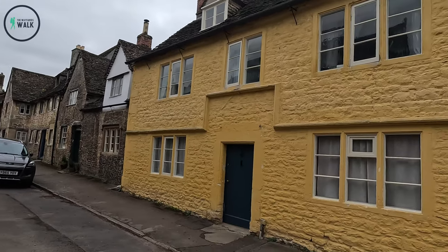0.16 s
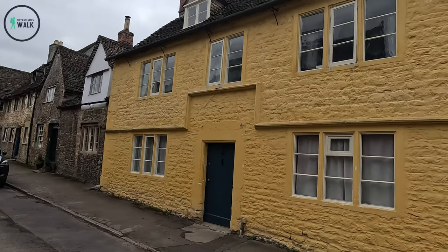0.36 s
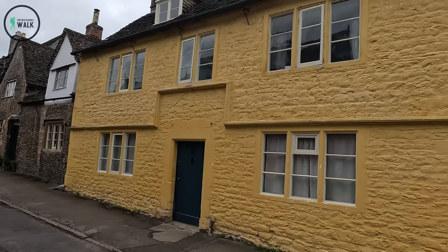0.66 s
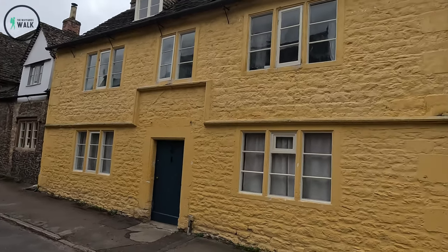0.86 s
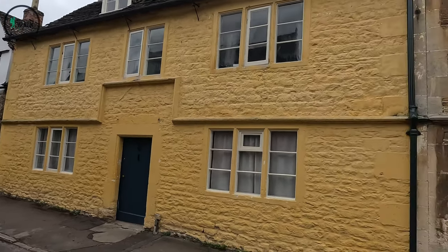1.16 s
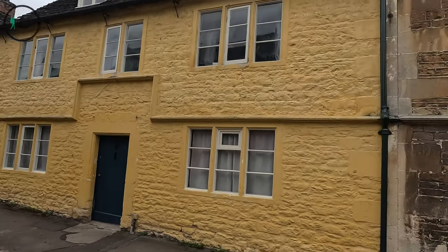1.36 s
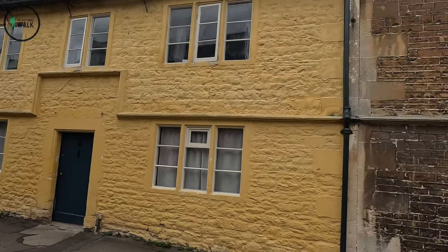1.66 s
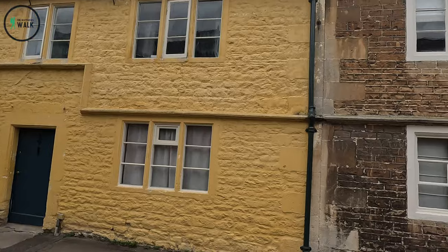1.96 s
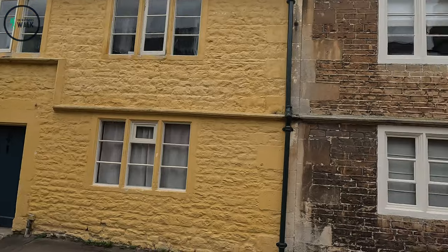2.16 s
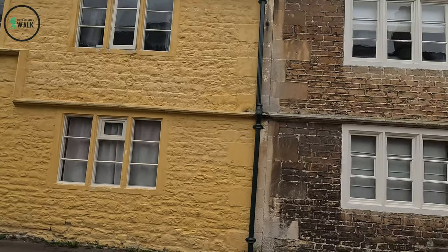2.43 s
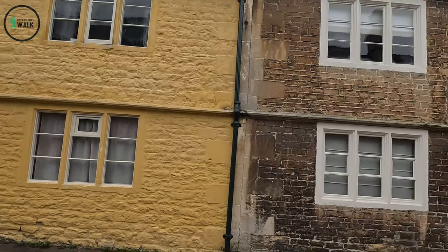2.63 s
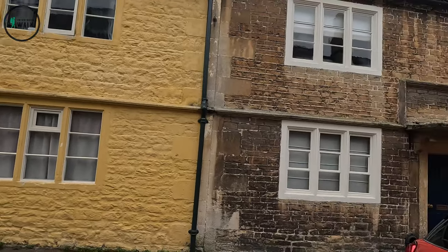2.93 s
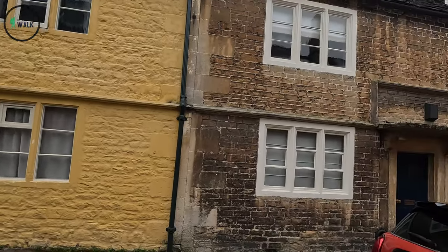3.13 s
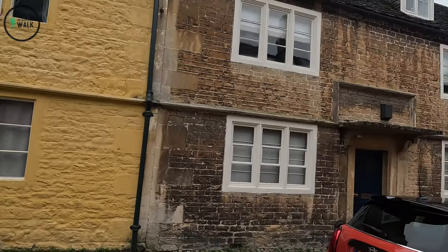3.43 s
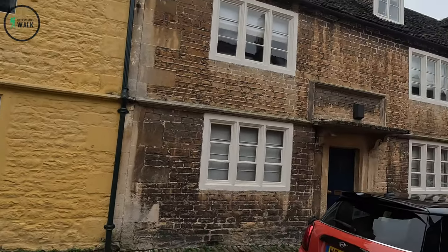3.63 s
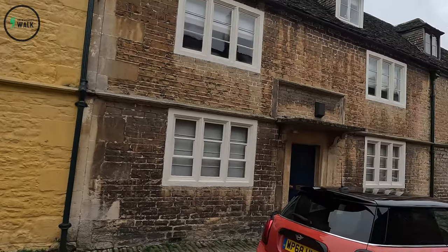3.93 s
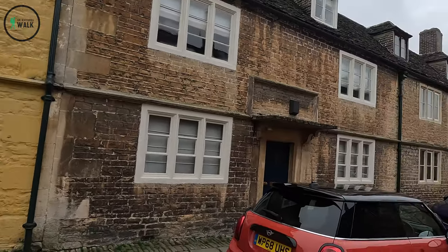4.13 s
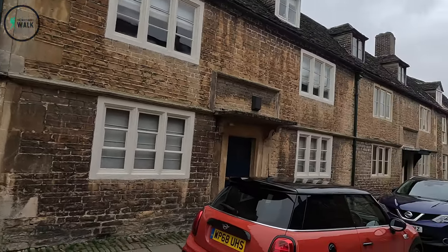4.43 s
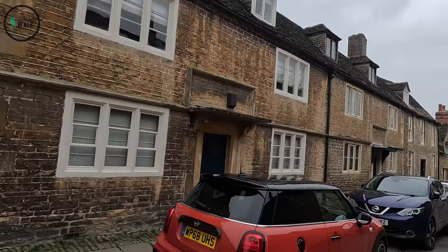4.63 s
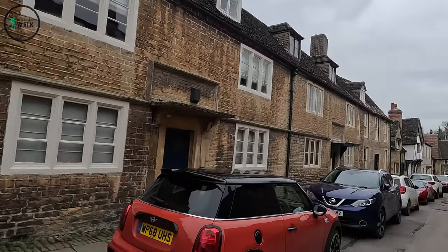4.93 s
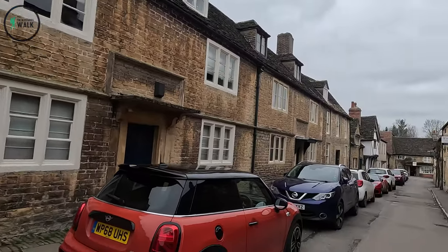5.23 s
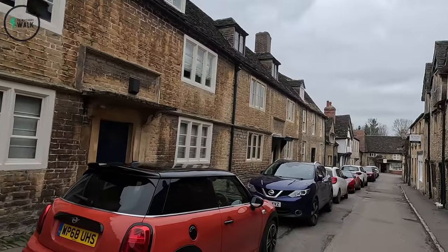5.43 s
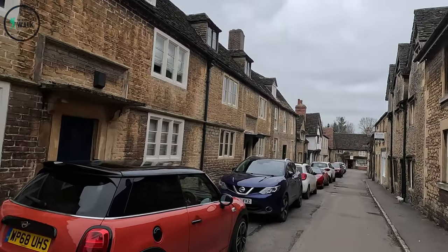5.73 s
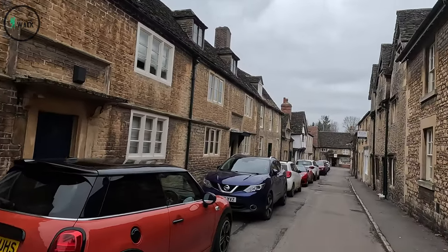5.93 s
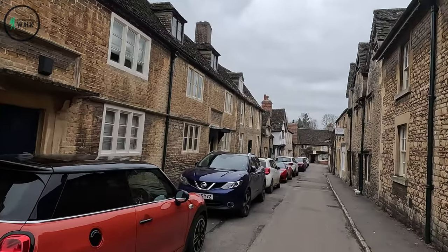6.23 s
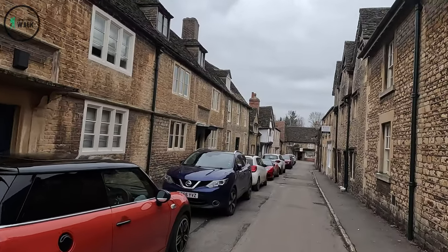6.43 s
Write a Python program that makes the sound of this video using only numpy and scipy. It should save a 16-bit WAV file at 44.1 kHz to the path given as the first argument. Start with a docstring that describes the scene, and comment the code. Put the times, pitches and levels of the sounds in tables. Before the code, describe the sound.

A quiet narrow street between stone houses. Distant rooks caw hoarsely again and again, softened by echo, while sharp short jackdaw yelps come near one second, just after four, and near six. Close to the microphone, shoes scuff grit, a loose stone clatters around 2.6 seconds, and dull bumps thud. Low wind rumbles on the microphone throughout.

```python
"""Rooks caw hoarsely from far trees beyond a narrow street of stone houses, and nearer jackdaws give short,
mostly falling yelps that slap between the fronts. Close by, shoes crunch on grit, a loose stone clatters and
soft bumps thud; wind rumbles on the microphone, thin far tones whistle and a far village washes behind.
Caws and yelps are summed harmonics with breath noise, the whistling tones are gliding sines, solid knocks are
short rings, and grit, wind and background are filtered noise; the fronts add echoes and a diffuse tail."""
import sys
import numpy as np
from scipy import signal
from scipy.fft import rfft, irfft, next_fast_len
from scipy.io import wavfile
from scipy.ndimage import uniform_filter1d, map_coordinates

SR = 44100
rng = np.random.default_rng(int(sys.argv[2]) if len(sys.argv) > 2 else 0)


def wav_record(signal):
    """Record a signal, one row per channel, as 16-bit PCM in the file named by sys.argv[1]."""
    frames = np.transpose(np.atleast_2d(signal))
    bounded = np.clip(frames, -1, 1)
    # unit amplitude maps onto the largest positive 16-bit level
    quanta = np.round(bounded * 32767).astype(np.int16)
    wavfile.write(sys.argv[1], SR, quanta)


N = 290072  # samples

# Rook caws, before the direct and echo gains: (time [s], length [s], onset to crest [s], downward slide [s],
# start pitch [Hz], top pitch [Hz], end pitch [Hz], start level [dB], crest level [dB], end level [dB],
# mouth opening [factor on throat frequencies], harshness [dB/octave], overtones [dB], far echo [dB])
ROOK_CAWS = [(-.05, 0.24, 0.08, 0.14, 194, 197, 186, -75, -75.5, -63, 0.89, -13, -4, -13),
             (0.596, .33, 0.063, 0.087, 158.2, 178.5, 164.8, -58, -57.5, -57, .965, -5, -4, -4.5),
             (.978, .37, 0.19, .13, 193.8, 194.9, 187.6, -71, -68.5, -70, 1.048, -3, 4, -9),
             (1.471, 0.56, 0.29, 0.15, 170.2, 177.2, 167, -78, -66, -62, 1.003, 0, 1, -11),
             (2.236, 0.41, .12, 0.15, 203, 207.7, 196.4, -66, -63.5, -62, 1.003, -7, -10, -8),
             (2.761, 0.17, .08, 0.18, 198, 201.2, 198, -69, -69.5, -74, 1.05, 22, -12, -1),
             (2.949, 0.39, .14, 0.12, 197.4, 199.5, 187.6, -73, -61, -63, 0.98, 5.5, -2.5, -16),
             (3.725, 0.4, 0.16, 0.14, 195.5, 201.6, 186.4, -57, -56.5, -58.5, 1.026, -6, 4, -12),
             (4.565, .46, .2, 0.12, 186.3, 192.5, 174.2, -56, -58.5, -61.5, 1.022, -4.5, -3, -5.5),
             (4.983, 0.28, 0.15, .13, 172, 173.6, 165, -69, -69.5, -65, .95, 3, 9, -14),
             (5.372, 0.33, 0.13, .13, 188.7, 192.3, 177.6, -63.5, -60, -65, 1.034, -1, 7, -10.5),
             (6.053, 0.6, 0.25, 0.13, 170.1, 175, 166, -77, -65, -86, 0.8, 8, 9, -3)]
# Resonances of a rook's throat: (frequency [Hz], gain [dB])
ROOK_THROAT = [(200, -67), (500, -36.5), (870, -25), (1010, -10.5), (1190, -9.5), (1320, -3), (1440, 3.5),
               (1600, 0), (1780, -3), (1960, 1.5), (2120, -10), (2600, -24), (3300, -20), (3900, -29.5),
               (8000, -93)]
# Band that a strained caw adds: (frequency [Hz], share of the overtones column [0-1])
STRAINED_BAND = [(2400, 0), (3000, 1), (3700, 1), (4600, 0)]
# High overtones dissolve into breath: (frequency [Hz], level left in the harmonics [dB])
HARMONICS_LEFT = [(2200, 0), (3000, -1), (3700, -4), (6000, -12)]
# Jackdaw yelps: (time [s], length [s], rise [s], level after the rise [dB], level change by the end [dB],
# start pitch [Hz], dive [octaves/s], voice break after onset [s], pitch at the break [Hz], sag [octaves/s],
# roughness before the base amount [0-1], beak resonance at start [Hz], at end [Hz], its strength [dB],
# delay of this yelp's own wall echo [s], echo level [dB], shrillness of the top overtones [dB])
JACKDAW_YELPS = [(0.672, 0.052, 0.013, -70, 4, 1380, 9, 0.014, 680, 5.3, 0.6, 2630, 2480, 16, 0.057, -6, -2),
                 (0.699, 0.069, 0.022, -57.5, -5.5, 1350, 8, 0.037, 650, 4, 0.6, 2450, 2460, 8, 0.044, -5.5, -6),
                 (0.967, 0.052, 0.02, -42.5, -11.5, 1313, 15, .025, 790, 13, 0.26, 1920, 2660, 7, 0.033, -12, 0),
                 (1.014, 0.032, 0.018, -53, -2, 1440, 9, 0.00484, 753, 10, 0.2, 2630, 2260, 6, 0.019, -10, -5),
                 (4.154, 0.049, 0.0048, -50, -8, 1492, 13.5, 0.028, 750, 9.6, 0.24, 1120, 2360, 14, 0.074, -9.5, -21),
                 (4.195, 0.027, 0.0073, -51.5, -2, 1679, 5, 0.072, 600, 6, 0.2, 1650, 1200, 2, 0.036, -9, -11),
                 (4.211, 0.052, 0.016, -55.5, 2, 1220, 5, 0.0041, 605, 5.4, 0.02, 2190, 1390, 18, 0.033, -22, -2),
                 (5.892, 0.06, 0.01, -49.5, -4.5, 1324, -7, 0.013, 628, 5.1, 0.21, 1440, 2300, 6, 0.03, -6.5, 0.5)]
# Resonances of a jackdaw's throat: (frequency [Hz], gain [dB])
JACKDAW_THROAT = [(500, -47), (950, -41), (1150, -7), (1350, 3.5), (1700, -4.5), (2150, 1), (2750, -1),
                  (3150, -18.5), (3600, -9.5), (4300, -17.5), (5200, -17), (7500, -29), (16000, -77)]
# Echoes off the house fronts, shared by all yelps: (delay [s], level [dB])
HOUSE_FRONTS = [(.022, -26), (.031, -12.5), (0.055, -13.5), (.074, -19.5), (.086, -21), (.105, -25)]
# Dying away of sound between the houses: (frequency [Hz], time to fall 60 dB [s])
STREET_T60 = [(150, 0.089), (1500, 0.58), (4000, 0.61), (12000, 0.2)]
# Far thin whistling tones, some of them high overtones of the caws, before the direct and tail gains:
# (time [s], length [s], start pitch [Hz], end pitch [Hz], level [dB], blur [share of the pitch])
WHISTLING_TONES = [(.13, 0.42, 828, 818, -78.5, 0.075), (1.147, 0.34, 5060, 4820, -90.5, 0.095),
                   (1.552, 0.19, 4500, 3960, -87.5, 0.088), (1.76, 0.14, 7600, 7100, -90, 0.021),
                   (2.038, 0.19, 7060, 6470, -89.5, 0.022), (3.578, 0.21, 4880, 4400, -84.5, 0.086),
                   (4.419, 0.27, 8260, 8600, -97, 0.023), (4.612, 0.13, 4560, 3790, -82.5, 0.062),
                   (4.752, 0.34, 3430, 3340, -81.5, 0.031), (5.017, .3, 3360, 3120, -85.5, .035),
                   (5.425, 0.33, 3024, 3050, -81.5, 0.019), (5.5, 0.29, 3290, 3440, -85, 0.025)]
# Soles rubbing on grit: (time of full pressure [s], rise [s], decay per 60 dB [s], grit level [dB],
# treble lift [dB/octave], hollow heel level [dB])
SCUFFS = [(0.151, 0.033, 0.5, -78, -4, -63.5), (1.886, .022, 0.5, -73.5, 9, -89),
          (2.01, 0.031, 0.16, -52, 0.5, -66), (2.463, 0.0048, 0.54, -74, 10, -66),
          (2.612, 0.0053, 0.84, -67, 4, -90), (3.267, 0.002, 0.39, -67.5, 8.5, -52),
          (3.299, 0.0083, 0.37, -68, 12, -57.5), (3.336, 0.0097, 0.3, -71, 14, -55.5),
          (3.358, 0.0059, 0.1, -58.5, 18, -45.5), (3.368, 0.0021, 0.1151, -58.5, 17, -50.5),
          (3.389, 0.0088, 0.63, -68.5, 14, -78), (4.11, 0.018, 2.5, -78, 13, -70.5),
          (4.965, .006, 0.18, -60.5, 1, -71), (5.008, 0.018, 0.5, -70, 15, -75),
          (5.697, 0.0024, 0.16, -55.5, -14, -70), (5.705, 0.0043, 0.2, -75, 20, -71),
          (6.374, 0.093, 0.5, -67.5, 7.5, -73), (6.525, 0.0021, 0.7, -64.5, -11, -69.5)]
# Colour of crushed grit: (frequency [Hz], gain [dB])
GRIT = [(300, -12), (800, -9), (1300, 7.5), (2200, 6), (3200, 6), (4800, -7), (7500, -15.5), (10500, -35),
        (13000, -31.5), (15500, -47)]
# Hollow resonances of the heel: (frequency [Hz], width of one filter pass [Hz], gain [dB])
HEEL = [(198, 127, -3), (327, 230, -9), (521, 150, -2.5), (614, 170, -12), (790, 67, -1.5),
        (1226, 900, -13)]
# Single stones cracking under a shoe: (time [s], peak level [dB], treble lift [dB/octave])
CRACKS = [(1.882, -51, -6), (2.463, -42, -22), (3.2987, -54, 0), (3.354, -43, 18), (3.363, -42, 17),
          (4.96, -40.5, -3), (5.026, -46, 12), (5.696, -43, -18), (6.524, -43, -22)]
# Knocks of a loose stone: (time [s], peak level of the ring [dB], treble lift [dB/octave])
STONE_KNOCKS = [(2.6092, -44, -3), (2.613, -45, -7), (2.6171, -49, -6), (2.627, -48, 0), (2.6604, -47, -1)]
# Ringing of the stone: (frequency [Hz], level [dB], time to fall 60 dB [s])
STONE_MODES = [(1260, -1.5, 0.03), (2050, -3, 0.025), (3110, 0, .025), (3500, 5, 0.013), (4400, -10, .008)]
# Soft bumps of footfalls and of the handling: (time [s], level [dB], ring [Hz], time to fall 60 dB [s])
SOFT_BUMPS = [(0.519, -58, 165, 0.27), (2.161, -55, 105.3, 0.81), (2.681, -52.5, 124.8, 0.48),
              (3.1, -53.5, 148.9, 0.76), (3.335, -51, 263, 0.077), (3.666, -51, 119, 0.098),
              (3.669, -48.5, 304, 0.034), (3.799, -53.5, 107.8, 0.57), (4.198, -53.5, 161.6, 0.73),
              (4.339, -50, 158, 0.079), (4.832, -51, 175, 0.1), (4.947, -50, 71.3, 0.47),
              (5.067, -46.5, 133, 0.041), (5.533, -46, 219, 0.034), (5.779, -50.5, 205, 0.06),
              (6.158, -43, 170, 0.2), (6.224, -52.5, 160.4, 0.23)]
# Wind rumble at the microphone, before gain and buffets: (time [s], level [dB])
RUMBLE_LEVEL = [(0.0, -39.5), (0.49, -59), (0.52, -47.5), (2.61, -50.5), (2.68, -39.5), (2.71, -48.5),
                (3.42, -51.5), (3.53, -39.5), (3.64, -48.5), (5.19, -48), (5.27, -45), (6.04, -48.5),
                (6.06, -54.5), (6.5, -45.5)]
# Wind flutter at the microphone, before gain and buffets: (time [s], level [dB])
FLUTTER_LEVEL = [(0, -66.5), (.6, -64.5), (1.5, -65.5), (2.15, -62.5), (2.45, -69.5), (2.7, -66),
                 (3.35, -63.5), (3.55, -66), (4.2, -61), (4.7, -65), (5, -65.5), (5.95, -63.5),
                 (6.5, -55.5)]
# Spectra of the two kinds of wind noise: (frequency [Hz], relative density [dB per Hz])
RUMBLE = [(8, -1.5), (18, 2.5), (33, -4), (52, -7), (70, -18.5), (100, -25), (200, -46.5), (2000, -120)]
FLUTTER = [(20, -23), (60, -5.5), (105, 1.5), (160, -2.5), (230, -6), (320, -17.5), (600, -30.5),
           (4000, -110)]
# Wash of the far village: (frequency [Hz], relative density [dB per Hz])
VILLAGE = [(30, -31), (150, -8.5), (280, -3), (400, -3), (600, -4.5), (800, -5.5), (1100, -2.5),
           (1600, -7.5), (2200, -11.5), (3000, -25), (4500, -29.5), (8000, -30), (12000, -43), (16000, -47)]
# Strength of that wash, before its sway: (time [s], level [dB])
VILLAGE_LEVEL = [(0, -72), (.5, -72.5), (1.3, -71), (2.8, -71), (3.5, -71.5), (4.4, -71.5), (5.3, -71),
                 (6.58, -70.5)]
# Clothes rustling close by: (frequency [Hz], relative density [dB per Hz])
RUSTLE = [(1500, -11), (3500, 3), (7000, -10), (10500, -14.5), (12800, -21), (14000, -20), (15000, -30)]
# Strength of the rustle, before its sway: (time [s], level [dB])
RUSTLE_LEVEL = [(0, -91.5), (1.1, -85), (1.3, -83.5), (2.9, -88), (3.5, -80), (3.9, -83), (4.3, -84),
                (5.3, -86), (5.8, -79), (6.1, -85.5), (6.58, -77)]
# Many farther rooks blurred together, before their sway: (time [s], level [dB])
ROOKERY_LEVEL = [(0, -82), (.5, -90), (1.15, -69), (1.45, -75.5), (2.1, -70.5), (2.8, -75.5), (3.6, -77),
                 (4.4, -74.5), (5.3, -71.5), (6.2, -68), (6.58, -74)]

# Caws: share of breath power, unevenness of the pulses and slow waver (shares of the pitch)
CAW_ROUGH, CAW_JITTER, CAW_WANDER = .1, .011, .0035
CAW_SMEAR_TURNS = .15  # random lag of each harmonic, which softens the pulses
CAW_HALF_LINES_DB = -12.5  # strong and weak pulses alternate: hoarse lines between the harmonics
CAW_SCATTER_DB = -9.5  # smeared paths against the direct one
NEAR_ECHO_S, NEAR_ECHO_DB = .06, -11.5  # a caw glances off the roofs
FAR_ECHO_S = .15  # a caw comes back from the end of the street
# Each harmonic swells and fades on its own: depth, and how often
FADING_DB, CAW_FADING_HZ, YELP_FADING_HZ = 2, 14, 130
YELP_JITTER, YELP_BASE_ROUGH = .08, .08  # pitch unevenness per unit roughness; roughness of every yelp
CLEAR_ROUGH_SHARE = 0.062  # before the break the voice is much smoother
BREAK_S, BREAK_DROP_DB = 0.0096, -1.5  # time from one register to the other; the harsh one is weaker
YELP_RELEASE_S = 0.0026
BEAK_OCTAVES = 0.25  # spread of the beak resonance
CONTACT_S = 0.0082  # time for the click of a knock to fall 60 dB
EDGE_HZ = 15600  # top of the recorder's band


def amp(db):
    """Decibels to gain."""
    return 10 ** (np.asarray(db) / 20)


def unit(x):
    """Scales to rms 1."""
    return x / np.sqrt(np.mean(x ** 2) + 1e-20)


def read(points, hz):
    """Reads a spectrum table on a log-frequency axis."""
    f, value = np.transpose(points)
    return np.interp(np.log(hz + 1), np.log(f + 1), value)


def curve(rows):
    """Reads a time table at every sample."""
    return np.interp(np.arange(N) / SR, *np.transpose(rows))


def add(mix, s, sound):
    """Mixes a sound in at time s, cutting what falls outside."""
    start = round(s * SR)
    sound = sound[max(-start, 0):]
    part = mix[max(start, 0):][:len(sound)]
    part += sound[:len(part)]


def colour(x, points, lift_db=0):
    """Filters by a spectrum table, tilted by lift_db per octave."""
    size = next_fast_len(len(x))
    hz = np.fft.rfftfreq(size, 1 / SR)
    gain = amp(read(points, hz) + lift_db * np.log2(1 + hz / 2000))
    return irfft(rfft(x, size) * gain, size)[:len(x)]


def drift(count, hz):
    """Smooth chance of about rms 1 that changes about hz times a second."""
    knots = rng.standard_normal(4096)
    return map_coordinates(knots, [np.arange(count) * hz / SR], order=3, mode="wrap")


def resonate(x, modes, order=1):
    """Parallel resonances; a higher order gives steeper sides."""
    out = np.zeros(len(x))
    for hz, width, db in modes:
        band = np.concatenate(signal.iirpeak(hz, hz / width, SR))
        out += amp(db) * signal.sosfilt([band] * order, x)
    return out


def street(x):
    """Diffuse tail between the house fronts; the middle register lasts longest, bass and treble die sooner."""
    taps = rng.standard_normal(SR) * (rng.random(SR) < .1)
    hz, t, z = signal.stft(taps, SR, nperseg=256)
    decay = amp(-60 * t / read(STREET_T60, hz)[:, None])
    build_up = np.minimum(t / 0.0062, 1)
    tail = signal.istft(z * decay * build_up, SR, nperseg=256)[1]
    return signal.fftconvolve(x, tail / np.linalg.norm(tail))[:N]


def fading(hz, rate_hz):
    """dB by which each harmonic (one row of hz each) flickers, weakening towards the treble."""
    # one long slow curve is cut into rows, with a knot every 32 samples
    flicker = drift(hz.size // 32 + 1, 32 * rate_hz)
    flicker = np.interp(np.arange(hz.size) / 32, np.arange(len(flicker)), flicker)
    return read(HARMONICS_LEFT, hz) + FADING_DB * flicker.reshape(hz.shape)


def scatter(x, scatter_s=0.014):
    """Roofs and branches smear a far sound over a few hundredths of a second."""
    t = np.arange(SR // 8) / SR
    paths = rng.standard_normal(len(t)) * np.exp(-t / scatter_s)
    return signal.fftconvolve(x, paths / np.linalg.norm(paths))[:N]


def rooks(jitter_hz=140, wander_hz=28, shimmer=0.36, rise=0.054, release=.05, direct_db=-3.0, wet_db=-10):
    """Uneven pulses and puffs of air through the throat; pitch scoops up to a crest, then slides down."""
    out = np.zeros(N)
    for (s, length, crest, slide, start_hz, top_hz, end_hz, start_db, crest_db, end_db,
         mouth, harsh_db, overtones_db, echo_db) in ROOK_CAWS:
        t = np.arange(int(length * SR)) / SR
        scoop = (top_hz - start_hz) * np.maximum(1 - t / crest, 0) ** 2
        sag = (top_hz - end_hz) * (1 - np.exp(-(np.maximum(t - crest, 0) / slide) ** 2))
        hz = top_hz - scoop - sag
        uneven = 1 + CAW_JITTER * drift(len(t), jitter_hz) + CAW_WANDER * drift(len(t), wander_hz)
        turns = np.cumsum(hz * uneven) / SR

        # harmonics, with half-number lines between them
        k = np.arange(4, 64)[:, None] / 2
        lines = k * hz
        throat_db = read(ROOK_THROAT, lines / mouth) + harsh_db * np.log2(1 + lines / 2000)
        throat_db += overtones_db * read(STRAINED_BAND, lines)
        half_lines_db = np.where(k % 1, CAW_HALF_LINES_DB, 0)
        heights = amp(throat_db + fading(lines, CAW_FADING_HZ) + half_lines_db)
        lags = CAW_SMEAR_TURNS * rng.standard_normal(k.shape)
        pulses = (heights * np.cos(2 * np.pi * (k * turns + lags))).sum(0)
        clean = unit(pulses * (1 + shimmer * drift(len(t), jitter_hz)))

        # one puff of breath a pulse
        puffs = (0.42 + np.exp(-(turns % 1) / 0.4)) * rng.standard_normal(SR)[:len(t)]
        bands = lines.mean(1)
        hoarse = unit(colour(puffs, np.c_[bands, throat_db.mean(1) - read(HARMONICS_LEFT, bands)]))

        effort = amp(np.interp(t, [0, crest, length], [start_db, crest_db, end_db]))
        effort *= np.minimum(t / rise, 1) * np.minimum((length - t) / release, 1)
        voice = np.sqrt(1 - CAW_ROUGH) * clean + np.sqrt(CAW_ROUGH) * hoarse
        caw = amp(direct_db) * effort * voice
        heard = scatter(caw) * amp(CAW_SCATTER_DB)
        add(heard, 0, caw)
        add(out, s, heard)
        add(out, s + NEAR_ECHO_S, amp(NEAR_ECHO_DB) * scatter(caw))
        add(out, s + FAR_ECHO_S, amp(echo_db) * scatter(caw))
    return out + amp(wet_db) * street(out)


def eddies(spectrum, steady_s=.12):
    """Coloured turbulence noise whose slow level is evened out."""
    x = colour(rng.standard_normal(N), spectrum)
    return x / np.sqrt(uniform_filter1d(x ** 2, int(steady_s * SR)) + 1e-20)


def wind(gust_db=1, flutter_db=-1, buffet_db=2.5, buffet_hz=10, flutter_buffet_db=2):
    """Turbulence at the microphone: deep rumble and lighter flutter, shaken by the same random buffets."""
    buffets = drift(N, buffet_hz)
    rumble_level = amp(gust_db + curve(RUMBLE_LEVEL) + buffet_db * buffets)
    flutter_level = amp(flutter_db + curve(FLUTTER_LEVEL) + flutter_buffet_db * buffets)
    return rumble_level * eddies(RUMBLE) + flutter_level * eddies(FLUTTER)


def background(sway_db=2.0, rookery_sway_db=-2.4, rustle_db=3.0):
    """Swaying noise: wash of the village, blur of the far rookery, faint rustle of the walker's clothes."""
    village = unit(colour(rng.standard_normal(N), VILLAGE))
    village *= amp(curve(VILLAGE_LEVEL) + sway_db * drift(N, 8))
    rookery = unit(colour(rng.standard_normal(N), ROOK_THROAT, lift_db=-14.0))
    rookery *= amp(curve(ROOKERY_LEVEL) + rookery_sway_db * drift(N, 2.3))
    rustle = unit(colour(rng.standard_normal(N), RUSTLE))
    rustle *= amp(curve(RUSTLE_LEVEL) + rustle_db * drift(N, 25))
    return village + rookery + rustle


def whistling_tones(twitter_hz=400, flicker_db=3, direct_db=-5, wet_db=-3):
    """Far thin gliding tones, each a sine whose unsteady pitch is blurred by distance."""
    out = np.zeros(N)
    for s, length, start_hz, end_hz, db, blur in WHISTLING_TONES:
        count = int(length * SR)
        hz = np.linspace(start_hz, end_hz, count) * (1 + blur * drift(count, twitter_hz))
        swell = signal.windows.tukey(count, .5) * amp(flicker_db * drift(count, 50))
        tone = swell * np.sin(2 * np.pi * np.cumsum(hz) / SR)
        add(out, s, amp(db) * unit(tone))
    return amp(direct_db) * out + amp(wet_db) * street(out)


def shoes(grains_per_s=5000, spread_db=4.0, splinter=0.3, wet_db=-15):
    """Soles crush many small grains and a few single stones; a dragged heel adds a hollow note."""
    out, t = np.zeros(N), np.arange(SR // 2) / SR
    for s, rise, t60, db, lift_db, heel_db in SCUFFS:
        press = np.minimum(t / rise, 1) ** 2 * amp(-60 * np.maximum(t - rise, 0) / t60)
        sizes = amp(spread_db * np.minimum(rng.exponential(1, len(t)), 4))
        crushed = rng.random(len(t)) < grains_per_s / SR
        grains = rng.choice([-1, 1], len(t)) * sizes * crushed
        grit = unit(colour(grains, GRIT, lift_db))
        heel = unit(resonate(rng.standard_normal(len(t)), HEEL, order=2))
        add(out, s - rise, press * (amp(db) * grit + amp(heel_db) * heel))
    t = np.arange(-256, 768) / SR  # room ahead of the crack for the filter's pre-ring
    for s, db, lift_db in CRACKS:
        splinters = (t > 0) * np.exp(-abs(t) / .0005) * rng.standard_normal(len(t))
        crack = colour((t == 0) + splinter * splinters, GRIT, lift_db)
        add(out, s + t[0], amp(db) * crack / abs(crack).max())
    return out + amp(wet_db) * street(out)


def bumps(knock=0.67, knock_s=0.016, knock_hz=680, waver=0.059):
    """Each bump is a dull knock of smooth noise and a short low ring of wavering pitch."""
    out, t = np.zeros(N), np.arange(SR // 2) / SR
    for s, db, hz, t60 in SOFT_BUMPS:
        turns = np.cumsum(hz * (1 + waver * drift(len(t), 60))) / SR
        ring = np.sin(2 * np.pi * turns) * amp(-60 * t / t60)
        thud = knock * drift(len(t), knock_hz) * np.exp(-t / knock_s)
        add(out, s, amp(db) * (ring + thud) * np.minimum(t / 0.0018, 1))
    return out


def jackdaw_throat(hz, beak_hz, beak_db):
    """Gain in dB of the throat with the beak resonance on top."""
    octaves_off = np.log2(hz / beak_hz)
    return read(JACKDAW_THROAT, hz) + beak_db * np.exp(-.5 * (octaves_off / BEAK_OCTAVES) ** 2)


def jackdaw_voice(hz, rough, beak_hz, beak_db, jitter_hz=900, half_lines=0.89, rasp=0.97):
    """Harmonics sweep through the throat; roughness adds jitter, period doubling and a rasp of air."""
    rough = rough + YELP_BASE_ROUGH
    uneven = 1 + YELP_JITTER * rough * drift(len(hz), jitter_hz)
    phase = 2 * np.pi * np.cumsum(hz * uneven) / SR
    k = np.arange(2, 25)[:, None] / 2  # half numbers are the doubled period
    heights = amp(jackdaw_throat(k * hz, beak_hz, beak_db) + fading(k * hz, YELP_FADING_HZ))
    heights = heights * np.where(k % 1, half_lines * rough, 1)
    voice = (heights * np.sin(k * phase)).sum(0) / np.sqrt((heights ** 2).sum(0) / 2)
    bands = np.geomspace(400, 16000, 80)
    air_db = jackdaw_throat(bands, beak_hz.mean(), beak_db) - read(HARMONICS_LEFT, bands) / 2
    air = unit(colour(rng.standard_normal(SR)[:len(hz)], np.c_[bands, air_db]))
    return voice + rasp * rough * air


def walls(x):
    """Distinct slaps from the house fronts, each a delayed weaker copy."""
    out = np.zeros(N)
    for delay, db in HOUSE_FRONTS:
        add(out, delay, amp(db) * x)
    return out


def jackdaws(wet_db=-17):
    """A clear gliding voice that usually breaks into a lower, harsh, sinking one; a beak resonance slides."""
    out = np.zeros(N)
    for (s, length, rise, level_db, fade_db, start_hz, dive, break_s, low_hz, sag, rough,
         beak_start_hz, beak_end_hz, beak_db, delay, slap_db, shrill_db) in JACKDAW_YELPS:
        t = np.arange(int(length * SR)) / SR
        beak_hz = np.geomspace(beak_start_hz, beak_end_hz, len(t))
        clear_hz = start_hz * 2 ** (-dive * t)
        harsh_hz = low_hz * 2 ** (-sag * (t - break_s))
        clear = jackdaw_voice(clear_hz, CLEAR_ROUGH_SHARE * rough, beak_hz, beak_db)
        harsh = jackdaw_voice(harsh_hz, rough, beak_hz, beak_db)
        broken = np.clip((t - break_s) / BREAK_S + .5, 0, 1)
        both = (1 - broken) * clear + amp(BREAK_DROP_DB) * broken * harsh
        voice = colour(both, [(3000, 0), (5000, shrill_db)])
        fade = fade_db * np.maximum(t - rise, 0) / (length - rise)
        effort = np.minimum(t / rise, 1) ** 2 * amp(level_db + fade)
        yelp = effort * np.minimum((length - t) / YELP_RELEASE_S, 1) * voice
        add(out, s, yelp)
        add(out, s + delay, amp(slap_db) * yelp)
    return out + walls(out) + amp(wet_db) * street(out)


def loose_stone(click=.5, wet_db=-14):
    """A stone rocks under the shoe, a quick clatter and one more knock: ringing modes and a contact click."""
    out, t = np.zeros(N), np.arange(SR // 8) / SR
    for s, db, lift_db in STONE_KNOCKS:
        ring = np.zeros(len(t))
        for hz, mode_db, t60 in STONE_MODES:
            level = amp(mode_db + lift_db * np.log2(hz / 2000) - 60 * t / t60)
            ring += level * np.sin(2 * np.pi * hz * t)
        burst = rng.standard_normal(len(t)) * amp(-60 * t / CONTACT_S)
        contact = colour(burst, GRIT, lift_db)[:len(t) // 2]
        add(out, s, amp(db) * ring / abs(ring).max())
        add(out, s, amp(db) * click * contact / abs(contact).max())
    return out + amp(wet_db) * street(out)


def scene():
    """All sources, far and near, summed at one microphone."""
    far = rooks() + jackdaws() + whistling_tones()
    walker = shoes() + loose_stone() + bumps()
    return (far + walker + wind() + background())[None]


def record(dry):
    """The recorder's band limit: a steep lowpass."""
    lowpass = signal.firwin(511, EDGE_HZ, window=("kaiser", 9), fs=SR)
    return signal.oaconvolve(dry, lowpass[None], "same")


dry = scene()
out = record(dry)
wav_record(out)
```